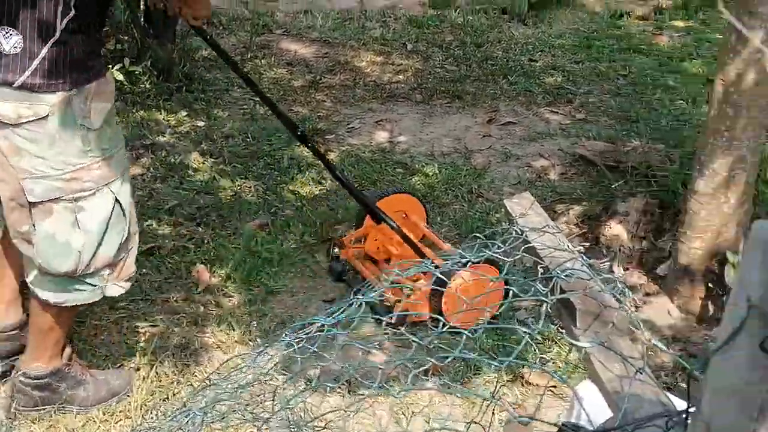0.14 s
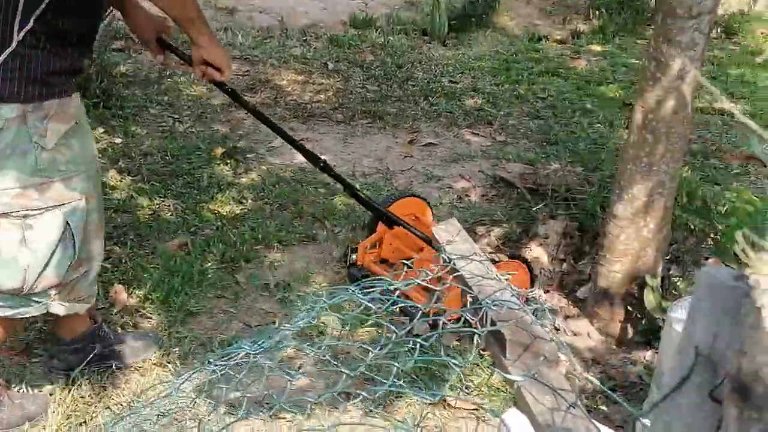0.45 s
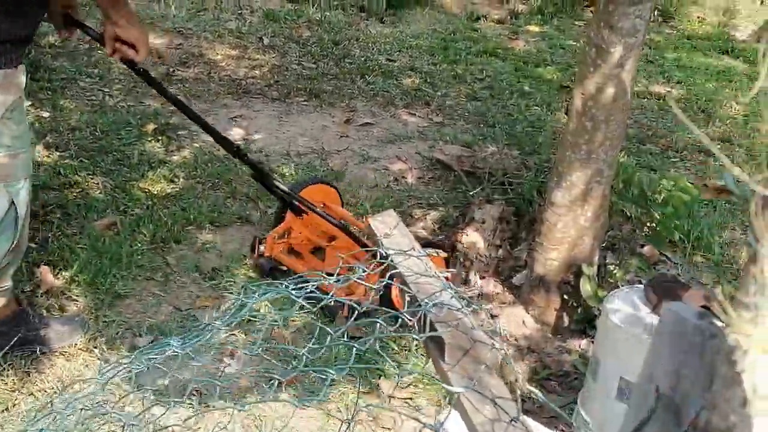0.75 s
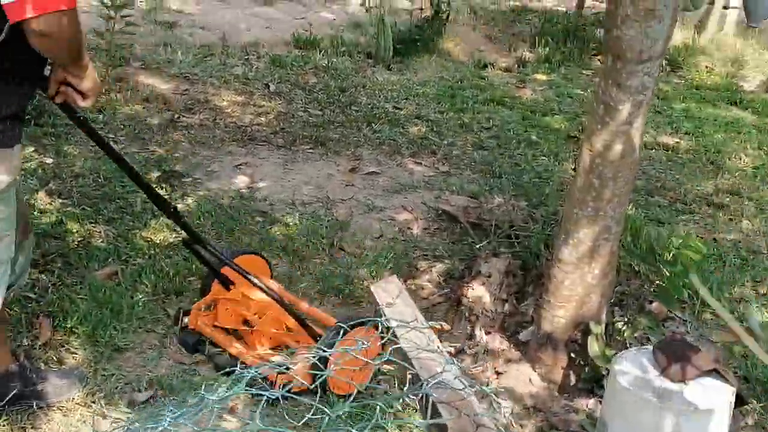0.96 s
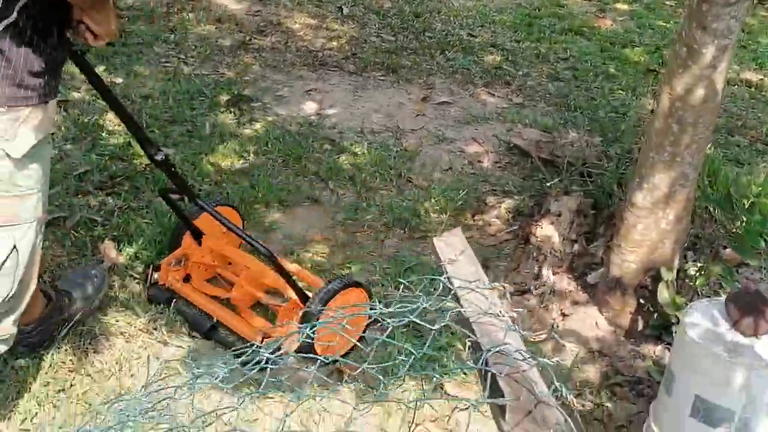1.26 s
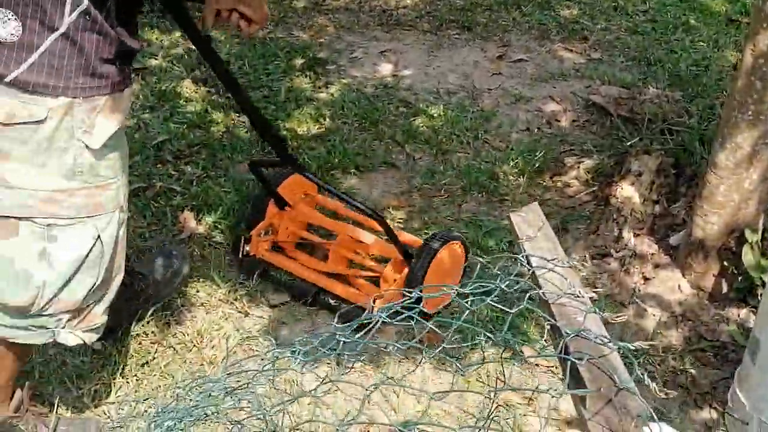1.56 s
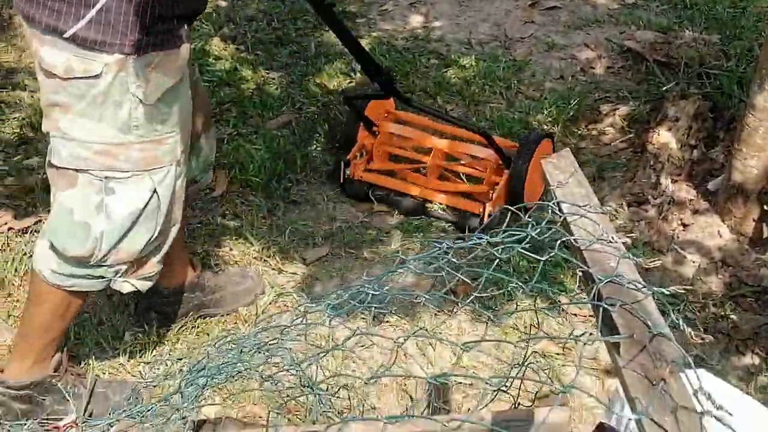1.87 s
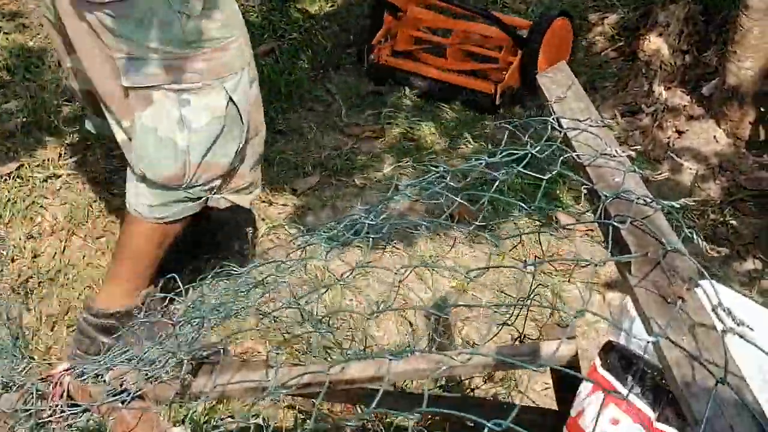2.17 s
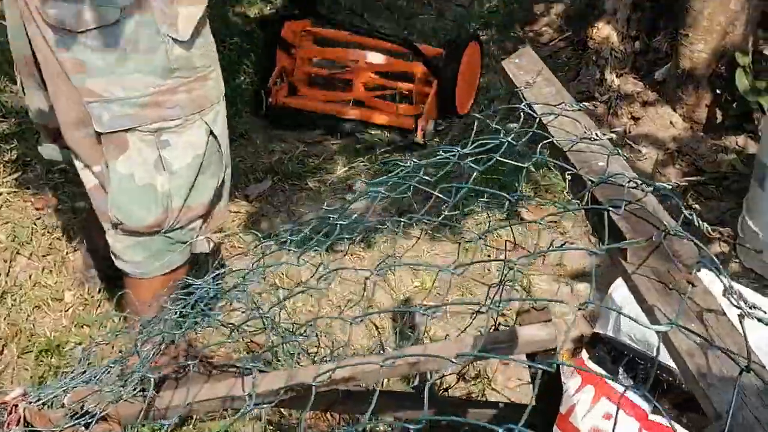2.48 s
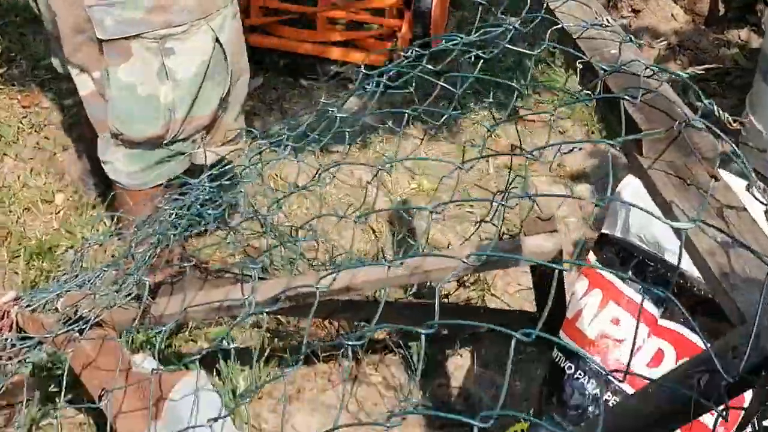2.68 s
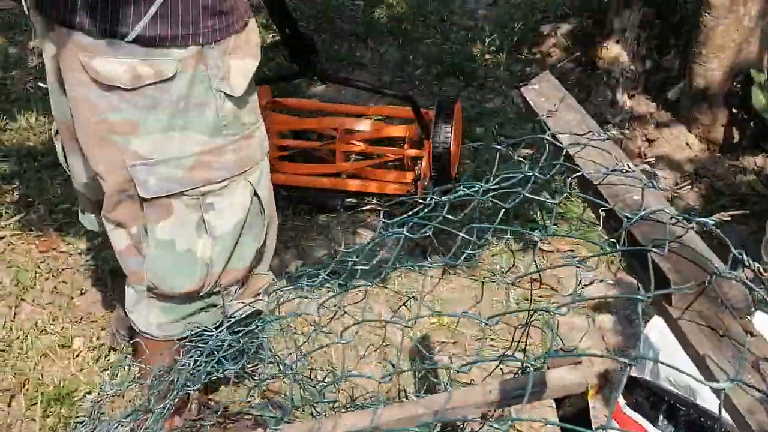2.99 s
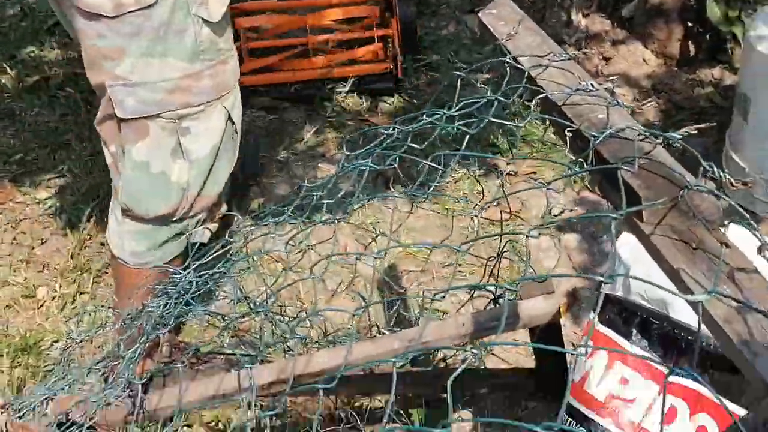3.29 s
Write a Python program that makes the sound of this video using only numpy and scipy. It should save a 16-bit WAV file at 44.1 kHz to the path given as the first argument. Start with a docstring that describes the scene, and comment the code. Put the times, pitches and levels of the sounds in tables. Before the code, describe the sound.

Gritty metallic snipping from a manual reel mower comes in three pushes, each fast then slowing, with knocks at the later two; a steady low engine hums far off in open air, narrow-band mono pickup.

```python
"""Reel mower on grass

A hand-pushed reel mower is shoved in three strokes; the first is already under way at the start.
Five uneven blades scrape the steel bed knife with gritty noise and sometimes drag hard; each shove speeds
the reel up, then it coasts down. The bearings whirr, and the drive clunks at the second and third shove.
Dull thumps come around the last shove. An engine made of filtered pulses drones steadily some way off,
heard at a changing level, over a low rumble and faint open air made of filtered noise."""
import sys
import numpy as np
from scipy import signal
from scipy.fft import rfft, irfft
from scipy.io import wavfile
from scipy.ndimage import uniform_filter1d

SR = 44100
rng = np.random.default_rng(int(sys.argv[2]) if len(sys.argv) > 2 else 0)


def put_to_file(sound):
    """Save the sound as 16-bit audio at rate SR, in the file named by the first command-line argument."""
    columns = np.atleast_2d(sound).T  # one column per channel
    safe = np.clip(columns, -1, 1)
    whole_steps = np.round(safe * 32767)
    wavfile.write(sys.argv[1], SR, whole_steps.astype(np.int16))


N = 151263  # length in samples

# shoves of the mower: start t/s, end t/s, top reel speed/(turns per s)
STROKES = [(-.1, .3, 24.5), (1.625, 1.85, 24), (3.128, 3.4, 24)]
# how hard each blade meets the knife, before UNEVEN scales it: level/dB
BLADE_LEVELS = [-3, 0.5, 2.5, 1, 0.5]
# how much the blades differ; a negative share swaps strong and weak: t/s, share of BLADE_LEVELS
UNEVEN = [(.1, 0), (.45, 1.5), (1.201, -0.4), (1.699, 0.04), (3.4, 0.66)]
# scrape before the part trims: t/s, blade edge level/dB, bed knife level/dB, frame level/dB
SCRAPE = [(0, -29.5, -42, -39.5), (.11, -33.5, -43, -47), (.138, -39, -51.5, -45), (.15, -29, -41.5, -47),
          (.37, -31, -43.5, -43.5), (.6, -33.5, -49.5, -46.5), (.78, -39.5, -48, -47),
          (.94, -41, -48, -43.5), (1.06, -39, -46, -41), (1.2, -43.5, -55.5, -45), (1.25, -50, -55, -46),
          (1.37, -56.5, -78, -57), (1.6, -67, -66, -58), (1.635, -42.5, -44.5, -40), (1.7, -35, -40, -39.5),
          (1.8, -31, -42, -45.5), (1.92, -33.5, -44, -46.5), (2.02, -32.5, -41.5, -42.5),
          (2.22, -37, -45, -54), (2.255, -44, -51, -61), (2.28, -38.5, -48.5, -49),
          (2.55, -38.5, -44.5, -48), (2.595, -45.5, -50, -49.5), (2.635, -41, -42, -47.5),
          (2.7, -48, -52, -56), (2.76, -43, -47, -44.5), (2.86, -50, -55, -44.5), (2.98, -65, -64.5, -57.5),
          (3.12, -64, -65.5, -55), (3.14, -44, -45, -47), (3.215, -47, -57, -62), (3.24, -35.5, -39, -46),
          (3.3, -36, -41.5, -45.5), (3.43, -34.5, -43.5, -50)]
# tone colour of the blade edges, the bed knife and the frame: f/Hz, relative level/dB
EDGE_RING = [(2470, -40.5), (4200, -8), (5310, 0.5), (5750, -3.5), (6130, -0.5), (6600, -3.5), (7130, -1.5),
             (7470, -6.5), (7760, -23.5), (7900, -17.5), (10300, -53.5), (17400, -120)]
KNIFE_RING = [(1700, -17), (2100, -9.5), (2380, -1), (2720, -6.5), (3050, 0.5), (3360, 0.5), (3600, -4),
              (3800, -3), (4100, 1), (4500, 2), (5000, -1)]
FRAME_RING = [(500, -4.5), (700, -5.5), (930, -10.5), (1050, 5.5), (1250, -8), (1650, 2.5), (1850, 1),
              (2100, -2), (2400, -3), (2800, -13.5), (3600, -31)]
# hard drags of a blade: t/s, blade edge level/dB, bed knife level/dB, length/s
SNIPS = [(0.008, -35, -46.5, 0.01), (0.146, -30.5, -41.5, 0.017), (.187, -30.5, -45, .016),
         (0.282, -30.5, -38, 0.028), (0.316, -30, -43, 0.0071), (.366, -28.5, -52.5, 0.012),
         (0.439, -32, -43, .018), (0.497, -40, -44.5, 0.012), (0.585, -29.5, -41.5, 0.017),
         (.702, -34.5, -46.5, 0.0083), (0.752, -32.5, -39, 0.014), (0.766, -30, -50, 0.016),
         (0.814, -35.5, -38.5, 0.0073), (0.896, -34, -43, 0.0093), (1.113, -43, -56, 0.009),
         (1.33, -39, -66, 0.0043), (1.679, -38, -52, 0.0075), (1.687, -45, -41, 0.016),
         (1.733, -39, -41.5, 0.017), (1.767, -27, -33.5, 0.0083), (1.782, -31.5, -34.5, 0.011),
         (1.821, -35, -40, 0.013), (1.829, -35.5, -45, 0.011), (1.846, -31, -50, .006),
         (1.932, -33.5, -41.5, 0.0085), (2.013, -37.5, -41.5, 0.015), (2.101, -37, -43, .016),
         (2.272, -36.5, -43, 0.0093), (2.306, -40.5, -41.5, 0.019), (2.353, -40.5, -40, .011),
         (2.384, -41, -43.5, 0.02), (2.436, -38, -50, .008), (2.55, -41, -43, .014),
         (2.608, -39.5, -40.5, 0.0094), (2.668, -46, -51, .008), (2.842, -42, -58, 0.011),
         (3.227, -41, -41, 0.012), (3.281, -33.5, -40, 0.016), (3.308, -33, -36, 0.011),
         (3.355, -34, -38, 0.015)]
# clear notes of the steel reel: f/Hz, relative level/dB, time to fade by 60 dB/s
STEEL_MODES = [(2340, -8.5, 0.14), (3342, -2, .15), (5480, 0, .09), (6070, -3.5, 0.044), (7240, 0, 0.082)]
# whirr of the bearings: t/s, centre f/Hz, level/dB
WHIRR = [(.6, 1250, -68.5), (1.1, 1050, -53), (1.3, 859, -52), (1.45, 778.5, -50.5), (1.61, 690, -48),
         (1.68, 1099, -60.5), (2.7, 1198, -63.5), (2.9, 980, -53.5), (3.1, 699, -60), (3.2, 700, -73)]
# knocks as the drive catches: t/s, level/dB, pitch ratio
CLUNKS = [(1.619, -30.5, 1.07), (1.6289, -19, 1.07), (1.636, -32, .95), (1.65, -29.5, 1.05),
          (3.132, -23.5, 1.), (3.152, -37, 1.17)]
# notes in each knock, before the pitch ratio: f/Hz, relative level/dB, time to fade by 60 dB/s
CLUNK_MODES = [(770, -7, 0.02), (1050, 2.5, 0.051), (1677, 0.5, 0.054), (1780, -1, 0.016),
               (2100, -15.5, 0.0098), (3100, -15, .05)]
# dull thumps: t/s, level/dB, f/Hz
THUMPS = [(3.046, -27.5, 105), (3.085, -22.5, 89), (3.12, -31, 131), (3.146, -23.5, 123), (3.182, -24, 112),
          (3.255, -28.5, 79), (3.311, -32.5, 71)]
# engine tone: multiple of the firing rate, relative level/dB
ENGINE_ORDERS = [(1, -5.5), (2, -12), (3, -29), (4, 5), (5, -15.5), (6, 3.5), (7, 8.5), (8, 1.5), (9, -3.5),
                 (10, -11.5), (11, -22), (12, -30), (13, -23.5), (14, -11.5), (15, -15.5), (16, -11.5),
                 (17, -21.5), (18, -19), (19, -17), (20, -36), (21, -18), (22, -18), (23, -19), (24, -29.5)]
# heard level of the drone before its trim: t/s, then level/dB below 240 Hz, near 290 Hz, near 340 Hz,
# above 360 Hz
DRONE = [(0, -55.5, -36, -44, -42.5), (.1, -49.5, -44, -38.5, -47), (.37, -48.5, -50.5, -46.5, -48.5),
         (.65, -45, -53, -42.5, -51.5), (.9, -44, -52.5, -39.5, -45.5), (1.1, -42.5, -50, -42.5, -46.5),
         (1.35, -38, -49.5, -45.5, -42), (1.59, -40.5, -43, -37.5, -41.5), (1.8, -48, -55, -48, -55),
         (1.97, -50.5, -58.5, -60.5, -67), (2.15, -51.5, -63, -51.5, -57.5), (2.38, -51.5, -57, -47, -45),
         (2.55, -48, -50.5, -44.5, -49), (2.75, -44, -45.5, -40.5, -43), (3., -49, -41, -47, -43),
         (3.12, -46, -43, -48, -48.5), (3.43, -56, -56, -51, -58)]
# heard level of the engine's upper buzz: t/s, level/dB
BUZZ = [(0, -71), (.7, -55.5), (1.25, -51), (1.6, -51), (1.75, -61), (2.3, -52.5), (2.95, -67), (3.43, -69)]
# low rumble: t/s, level/dB
RUMBLE = [(0, -47.5), (.5, -51.5), (.8, -47.5), (1.1, -46.5), (1.6, -46.5), (1.9, -54), (2.4, -47.5),
          (2.95, -44), (3.12, -36), (3.3, -47), (3.43, -46)]
# tone colour of the rumble and of the open air: f/Hz, relative level/dB
RUMBLE_COLOUR = [(22, -27), (45, -5.5), (80, -2.5), (150, -5), (280, -9), (500, -18), (900, -37),
                 (3000, -78.5)]
AIR_COLOUR = [(100, 3.5), (500, -1), (1050, -5), (1400, -3.5), (1900, -6), (2600, -14), (3800, -27),
              (5300, -12.5), (6300, -23.5), (7300, -30.5)]

COAST_TURNS_PER_S2 = 17.5  # speed lost to friction each second
FIRST_BLADE_TURN, BLADE_SCATTER_DB = 0.018, 1.28
# as shares of the gap between blades: how fast the bite builds, how slowly it slides off
BITE_SHARE, CONTACT_SHARE = 0.35, 0.72
RUB_SHARE = 0.12  # steady rub added to the bite
EDGE_DB, KNIFE_DB, FRAME_DB = -4, -1, -4  # trims of the three scrape parts
STEEL_T60_S, FRAME_T60_S, SNIP_T60_S = 0.023, 0.07, 0.02  # time to fade by 60 dB
ENGINE_HZ, FIRST_FIRING_S = 48.2, 0.0085
BOOM_DB, WAVER_DB = -0.5, 0.4
AIR_DB = -51
TOP_HZ = 7600


def undb(db):
    """Turn decibels into a plain gain."""
    return 10 ** (np.asarray(db) / 20)


def unit(x):
    """Scale to an average (RMS) strength of 1."""
    return x / np.sqrt(np.mean(x ** 2))


def times():
    """Time of every sample in seconds."""
    return np.arange(N) / SR


def curve(rows, axis=1):
    """Gain from one dB column of a table over time."""
    rows = np.array(rows)
    return undb(np.interp(times(), rows[:, 0], rows[:, axis]))


def through(x, response):
    """Let a sound excite a body that has the given response."""
    return signal.fftconvolve(x, response)[:len(x)]


def colour(x, points, size=8192):
    """Filter with the given (Hz, dB) shape that never sounds ahead of its input."""
    hz, db = np.array(points, float).T
    bins_hz = np.arange(size // 2 + 1) * SR / size
    gain = undb(np.interp(np.log(bins_hz + 1), np.log(hz), db))
    # folding the cepstrum makes the response minimum-phase
    cepstrum = irfft(np.log(gain))
    cepstrum[1:size // 2] *= 2
    cepstrum[size // 2 + 1:] = 0
    return through(x, irfft(np.exp(rfft(cepstrum))))


def cut(x, hz, kind, order=4):
    """Keep only the low, high or middle part of the spectrum."""
    return signal.sosfilt(signal.butter(order, hz, kind, fs=SR, output="sos"), x)


def walk(rate):
    """Smooth random drift, spread near 1; rate is in steps per second."""
    k = int(SR / rate)
    steps = np.repeat(rng.standard_normal(N // k + 1), k)
    return unit(uniform_filter1d(uniform_filter1d(steps, k), k)[:N])


def metal(t60, ring_db, size=8192):
    """A dry click followed by a crowd of close modes dying away."""
    tail = rng.standard_normal(size) * undb(-60 * np.arange(size) / SR / t60)
    tail *= undb(ring_db) / np.linalg.norm(tail)
    tail[0] += 1
    return tail / np.linalg.norm(tail)


def grit(per_s, spread_db):
    """Dense tiny slips of uneven size."""
    happens = rng.random(N) < per_s / SR
    size = rng.standard_normal(N) * undb(spread_db * rng.standard_normal(N))
    return unit(happens * size)


def mower(notes_db=-21):
    """Scrapes and snips set the steel of the reel singing; the bearings whirr and the drive clunks."""
    blades = reel() + snips()
    notes = undb(notes_db) * through(blades, steel_notes())
    return blades + notes + bearings() + clunks()


def reel():
    """Every blade scrapes with a ring of its own, and shakes the knife and the frame."""
    blade, press = contact()
    parts = [(EDGE_RING, [4500, 9000], STEEL_T60_S, grit(per_s=9000, spread_db=2), EDGE_DB),
             (KNIFE_RING, [1800, 4700], STEEL_T60_S, grit(per_s=6000, spread_db=1.0), KNIFE_DB),
             (FRAME_RING, [600, 3400], FRAME_T60_S, grit(per_s=4000, spread_db=1.0), FRAME_DB)]
    out = np.zeros(N)
    for k, (shape, band, t60, slips, db) in enumerate(parts):
        force = slips * press * undb(db) * curve(SCRAPE, axis=k + 1)
        ring = np.zeros(N)
        for b in range(len(BLADE_LEVELS)):
            ring += through(force * (blade == b), metal(t60, ring_db=0.5))
        toned_ring = cut(colour(ring, shape), band, "band", order=6)
        toned_slips = cut(colour(slips, shape), band, "band", order=6)
        out += toned_ring / np.std(toned_slips)
    return out


def contact():
    """Which blade is on the knife and how hard it presses: it bites, then slides off."""
    count = len(BLADE_LEVELS)
    blade, along = np.divmod((reel_turns() - FIRST_BLADE_TURN) * count, 1)
    passes = np.cumsum(np.diff(blade, prepend=blade[0]) != 0)
    blade = blade.astype(int) % count
    unevenness = np.interp(times(), *np.array(UNEVEN).T)
    scatter = BLADE_SCATTER_DB * rng.standard_normal(N)[passes]  # one draw per blade pass
    db = np.array(BLADE_LEVELS)[blade] * unevenness + scatter
    bite = (1 - np.exp(-along / BITE_SHARE)) * np.exp(-along / CONTACT_SHARE)
    press = uniform_filter1d(undb(db) * (RUB_SHARE + bite), size=130)
    return blade, unit(press)


def reel_turns():
    """Angle of the reel in turns: a shove takes it from half to top speed, then friction slows it evenly."""
    t, turns = times(), np.zeros(N)
    for start, release, top in STROKES:
        since = t - release
        speed_up = top / 2 / (release - start)
        slope = np.where(since < 0, speed_up, -COAST_TURNS_PER_S2)
        turns = np.where(t >= start, top * since + slope * since ** 2 / 2, turns)
    return turns


def snips(peak_share=0.59):
    """Now and then a blade drags hard: a quick swell rings edge and knife, then lets go."""
    t, out = times(), np.zeros(N)
    for k, (shape, band) in enumerate([(EDGE_RING, [4300, 9000]), (KNIFE_RING, [1600, 4300])]):
        drag = np.zeros(N)
        for at, *db, length in SNIPS:
            corners = [0, peak_share * length, length, 1.12 * length]
            drag += undb(db[k]) * np.interp(t - at, corners, [0.00089, 0.92, 0.58, 0.00047])
        slips = grit(per_s=9000, spread_db=3)
        ring = through(slips * drag, metal(SNIP_T60_S, ring_db=-7))
        toned_ring = cut(colour(ring, shape), band, "band")
        toned_slips = cut(colour(slips, shape), band, "band")
        out += toned_ring / np.std(toned_slips)
    return out


def steel_notes(size=8192):
    """The few clear notes that ring on in the reel, each a fading sine."""
    t, ring = np.arange(size) / SR, np.zeros(size)
    for hz, db, t60 in STEEL_MODES:
        ring += undb(db - 60 * t / t60) * np.sin(2 * np.pi * hz * t) / np.sqrt(t60)
    return ring / np.linalg.norm(ring)


def bearings(width_hz=130, flutter_db=2.0):
    """A rough whirr: slow noise times a tone whose pitch follows WHIRR, sinking as the reel coasts."""
    at, hz, _ = np.array(WHIRR).T
    phase = 2 * np.pi * np.cumsum(np.interp(times(), at, hz)) / SR
    rolling = cut(rng.standard_normal(N), width_hz, "low", order=2)
    flutter = undb(flutter_db * walk(60))
    return unit(rolling * np.sin(phase)) * curve(WHIRR, axis=2) * flutter


def clunks(chatter_s=0.0024, crack_db=-16, crack_s=0.0094, size=8192):
    """The drive takes up its slack and gives the frame a short, dry knock."""
    t, out = np.arange(size) / SR, np.zeros(N)
    for at, db, pitch in CLUNKS:
        ring = np.zeros(size)
        for hz, mode_db, t60 in CLUNK_MODES:
            ring += undb(mode_db - 60 * t / t60) * np.sin(2 * np.pi * hz * pitch * t)
        blow = 0.06 * rng.standard_normal(size) * np.exp(-t / chatter_s)
        blow[0] += 1
        knock = through(blow, ring)
        crack = unit(cut(rng.standard_normal(size), [350, 2000], "band", order=2)) * np.exp(-t / crack_s)
        clunk = knock / abs(knock).max() + undb(crack_db) * crack
        out += undb(db) * np.interp(times() - at, t, clunk, left=0)
    return cut(out, 3000, "low", order=2)


def thumps(t60=0.043, rise_s=0.0026, scuff_db=-10, scuff_s=0.024):
    """Soft, heavily damped low knocks, each with a dull scuff."""
    out = np.zeros(N)
    scuff = unit(cut(cut(rng.standard_normal(N), [80, 250], "band", order=2), 780, "low"))
    for at, db, hz in THUMPS:
        age = np.maximum(times() - at, 0)
        knock = -2 * undb(-60 * age / t60) * np.sin(2 * np.pi * hz * age)
        fading_scuff = undb(scuff_db) * scuff * np.exp(-age / scuff_s)
        out += undb(db) * (1 - np.exp(-age / rise_s)) * (knock + fading_scuff)
    return out


def engine(scatter_db=0.5, wander=0.0006, rough=0.88):
    """Even, steady firings boom in the exhaust; a rougher buzz rides on them."""
    cycles = np.cumsum(ENGINE_HZ * (1 + wander * walk(5))) / SR - FIRST_FIRING_S * ENGINE_HZ
    fires = np.diff(np.floor(cycles), prepend=-1) > 0
    pulses = fires * undb(scatter_db * rng.standard_normal(N))
    orders = [(k * ENGINE_HZ, db) for k, db in ENGINE_ORDERS]
    pipe = [(3.7, -46.0)] + orders + [(1600, -30.5), (4000, -64)]
    exhaust = colour(pulses, pipe)

    def below(hz):
        """Steep low-pass that adds no delay."""
        return signal.sosfiltfilt(signal.butter(24, hz, fs=SR, output="sos"), exhaust)

    # differences of neighbouring low-passes give four bands
    bands = np.diff([below(240), below(313), below(362), below(590)], axis=0, prepend=0)
    boom = np.zeros(N)
    for k, band in enumerate(bands):
        boom += unit(band) * undb(BOOM_DB + WAVER_DB * walk(2)) * curve(DRONE, axis=k + 1)
    gas = unit(rng.standard_normal(N) * np.exp(-(cycles % 1) / 0.52))  # a noisy puff per firing
    smeared = unit(through(pulses, metal(0.21, ring_db=13.5)))
    buzz = unit(cut(colour(smeared + rough * gas, pipe), 580, "high", order=8))
    return boom + buzz * curve(BUZZ)


def yard():
    """Low rumble and faint open air, both coloured noise with a drifting level."""
    rumble = unit(colour(rng.standard_normal(N), RUMBLE_COLOUR)) * curve(RUMBLE) * undb(1.7 * walk(7.6))
    air = unit(colour(rng.standard_normal(N), AIR_COLOUR)) * undb(AIR_DB + 0.7 * walk(8.46))
    return rumble + air


def scene():
    """All sources added up, the same in both channels."""
    return np.tile(mower() + thumps() + engine() + yard(), (2, 1))


def record(dry):
    """A narrow-band mono microphone: little below 26 Hz, a steep stop above TOP_HZ."""
    top = signal.ellip(10, 0.2, 80, TOP_HZ, fs=SR, output="sos")
    return signal.sosfilt(top, cut(dry, 26, "high"))


dry = scene()
out = record(dry)
put_to_file(out)
```